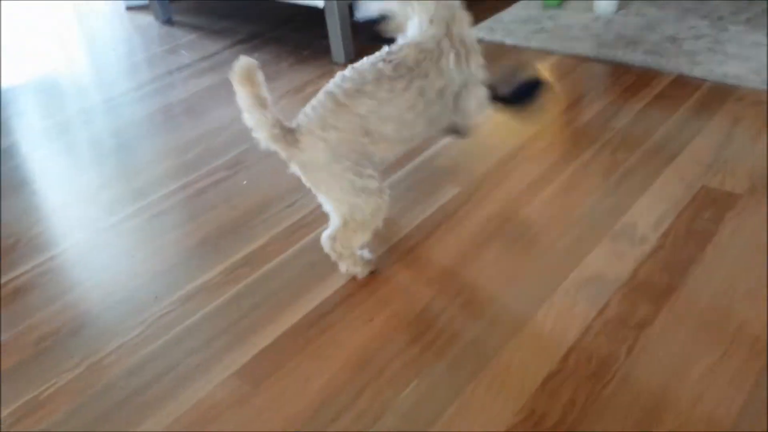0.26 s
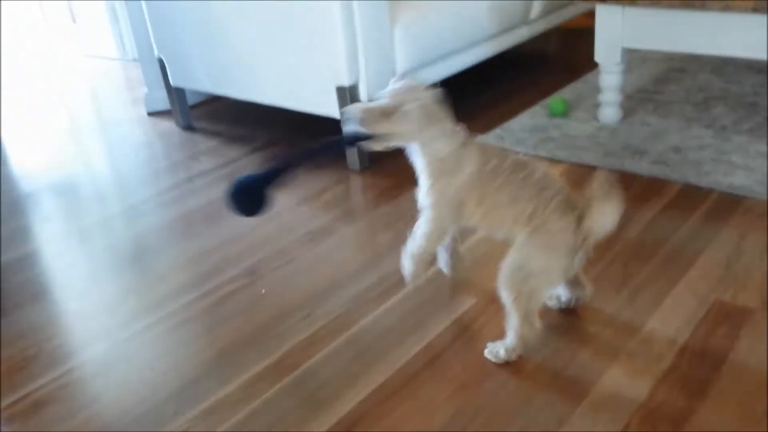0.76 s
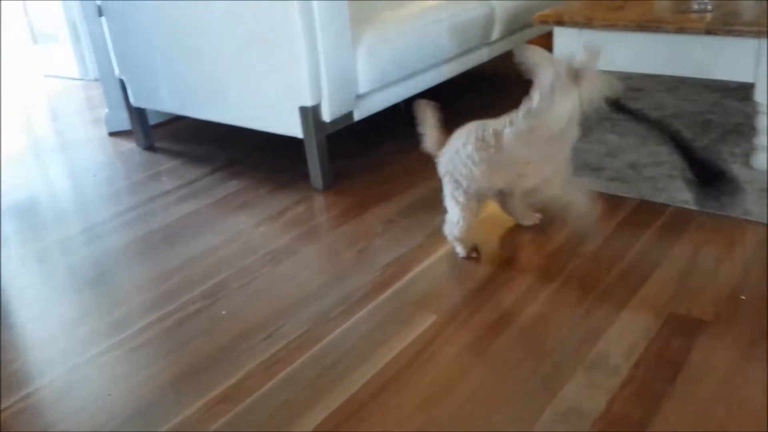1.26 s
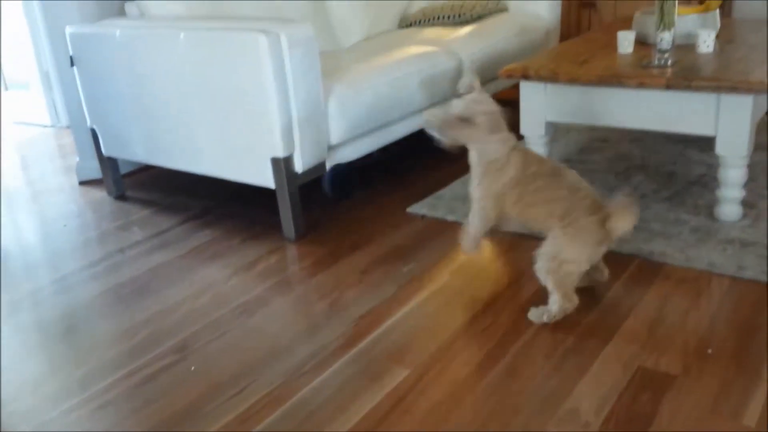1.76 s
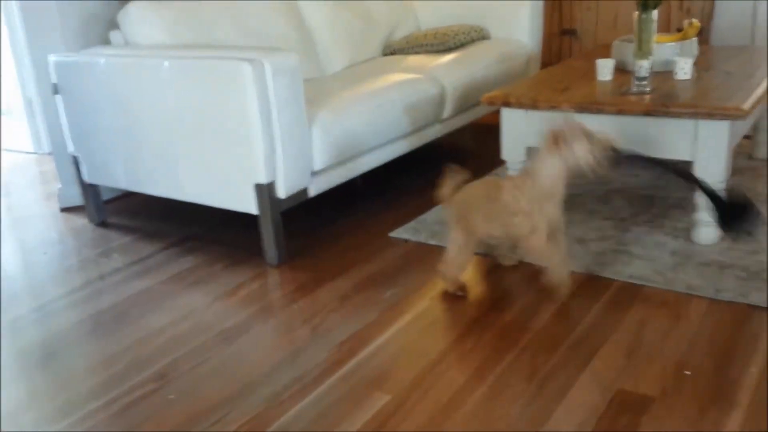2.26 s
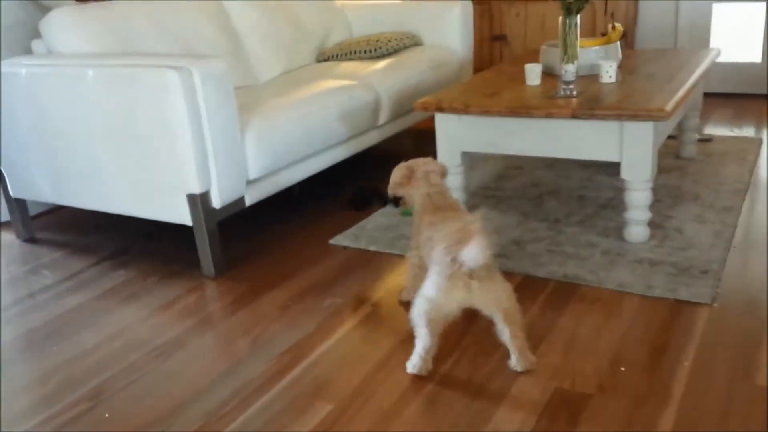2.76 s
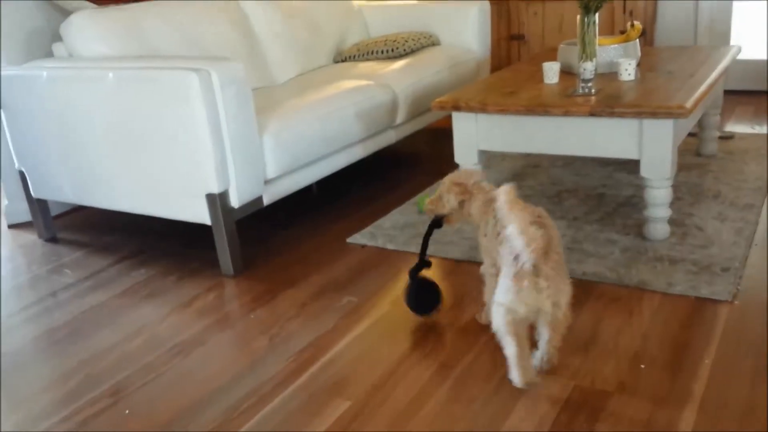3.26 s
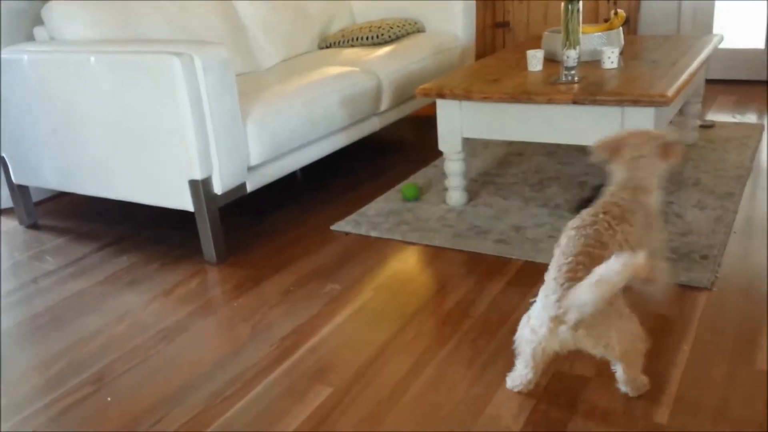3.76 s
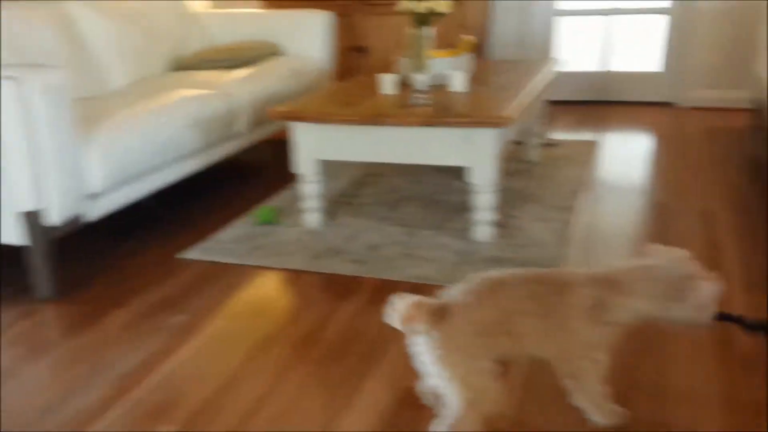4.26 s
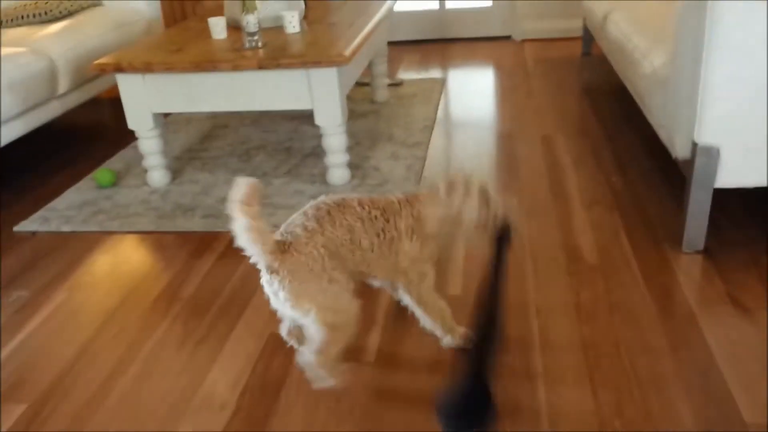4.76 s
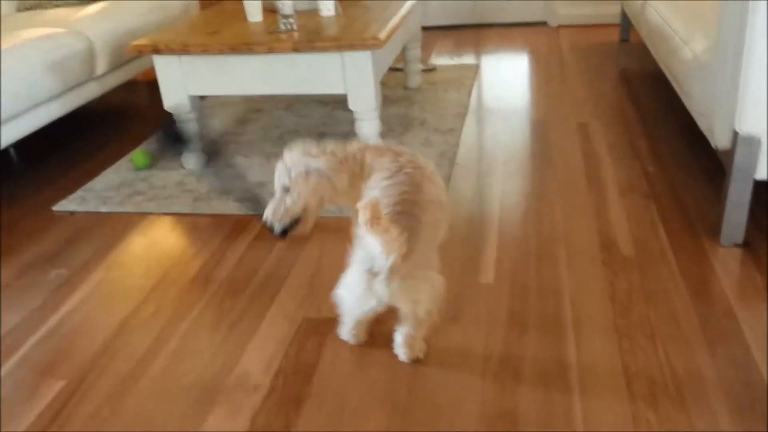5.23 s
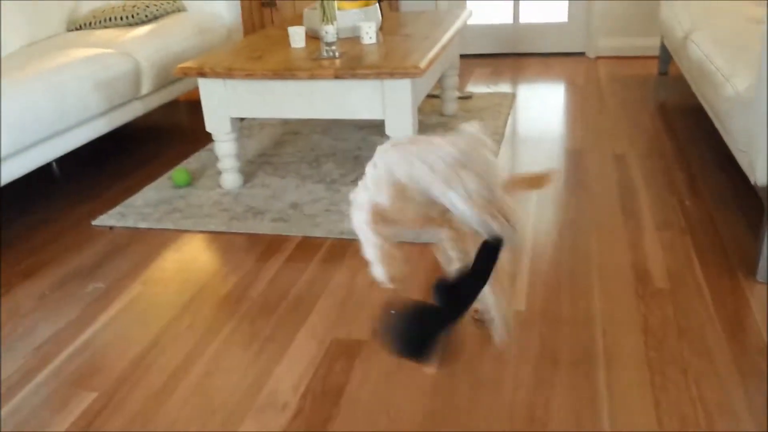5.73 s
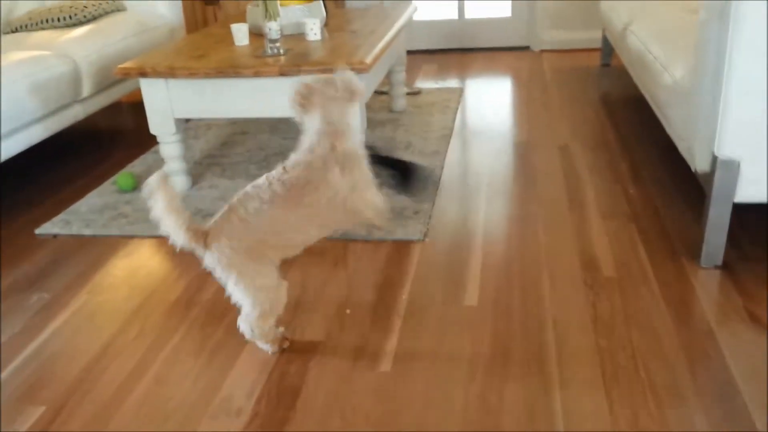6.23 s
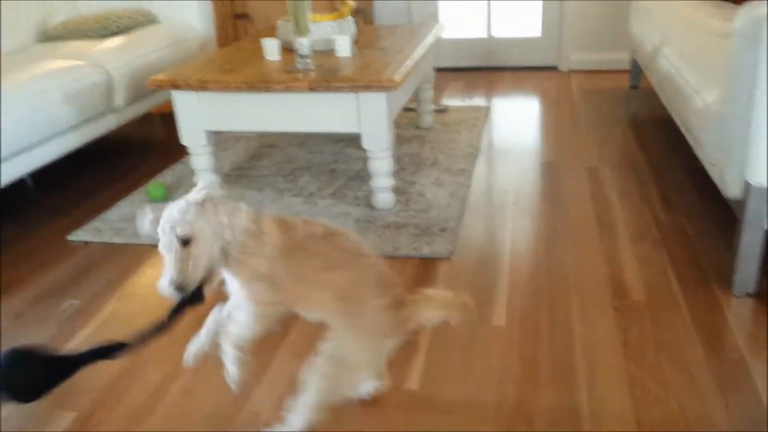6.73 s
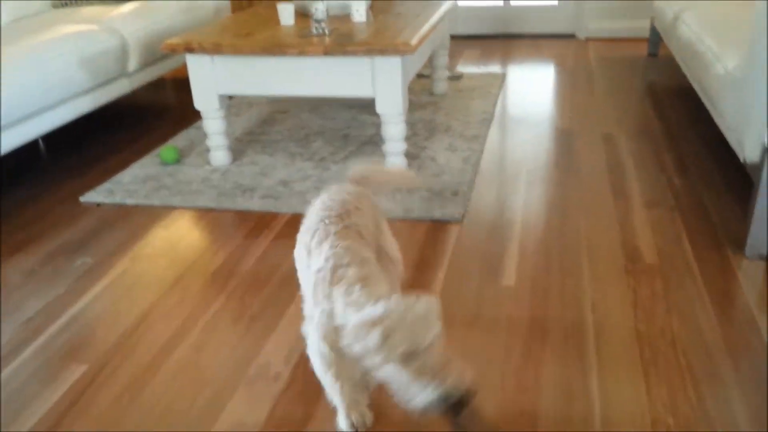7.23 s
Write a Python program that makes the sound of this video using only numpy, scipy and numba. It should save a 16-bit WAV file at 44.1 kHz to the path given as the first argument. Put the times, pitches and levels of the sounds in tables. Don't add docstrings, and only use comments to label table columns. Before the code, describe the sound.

A small dog growls in rough playful bursts, snorting and panting, as a cloth-wrapped ball knocks on wooden boards, claws click and a collar tag clinks.

```python
import sys
import numpy as np
from scipy import signal
from scipy.fft import rfft, irfft, next_fast_len
from scipy.io import wavfile
from scipy.ndimage import uniform_filter1d
from numba import njit

SR = 44100
rng = np.random.default_rng(int(sys.argv[2]) if len(sys.argv) > 2 else 0)


def wrap_up_sound(samples):
    columns = np.atleast_2d(samples).T
    tamed = np.clip(columns, -1, 1)
    steps = np.round(tamed * 32767).astype(np.int16)
    wavfile.write(sys.argv[1], SR, steps)


def elevation(decibels):
    levels = np.asarray(decibels, float)
    return 10 ** (levels / 20)


N = 330617
TIME = np.arange(N) / SR

# start in seconds, hold in seconds, chest level in dB,
# fold slaps per second in Hz, mouth opening in dB.
GROWLS = [(.478, 0.045, -36.5, 112.1, -9), (1.127, 0.26, -20, 142.2, -8.5), (1.692, .15, -24.5, 137.6, -5),
          (1.85, 0.09, -22.5, 139.7, -8.5), (2.35, 0.2, -32, 150.3, -6), (4.07, 0.0029, -37.5, 162, -1.5),
          (4.82, 0.04, -47, 133.1, -5), (5.125, 0.036, -52, 133.2, -8), (5.338, 0.04, -42, 109.6, -8),
          (5.757, 0.021, -32, 130, -9.5), (5.972, 0.032, -22.5, 130.4, -7), (6.0, .19, -18, 132.1, -11.5),
          (6.22, 0.11, -25.5, 125, -6), (6.605, .04, -27.5, 150.2, -12), (6.64, 0.09, -21.5, 158, -5.5),
          (6.73, 0.14, -17.5, 167.5, -10), (7.27, 0.035, -48, 119.7, 7.5)]
# frequency in Hz, width in Hz, level in dB.
MOUTH_RESONANCES = [(736, 77, -5), (1037, 175, -7), (1550, 320, -14.5), (2510, 590, -24.5),
                    (3670, 170, -19.5)]
# start in seconds, hold in seconds, level in dB,
# lip resonance in Hz.
SNARLS = [
    (1.16, 0.29, -40, 2480),
    (1.75, 0.18, -40.5, 2470),
    (2.37, 0.054, -59, 2360),
    (6.03, 0.24, -39.5, 2540),
    (6.27, 0.055, -46.5, 2360),
    (6.655, 0.044, -43, 2350),
    (6.76, 0.028, -39, 2250),
    (6.86, 0.072, -49.5, 2308),
]
# multiple of the lip resonance, width in Hz, level in dB.
LIP_PEAKS = [(1, 300, -3), (1.4, 450, -10.5), (1.6, 250, -22)]
# start in seconds, hold in seconds, level in dB, pitch in Hz.
WHINES = [
    (3.74, 0.18, -56.5, 985),
    (4.22, 0.044, -52, 965),
]
# start in seconds, hold in seconds, level in dB, nose resonance in Hz.
HUFFS = [(.06, 0.032, -45.5, 1780), (.26, 0.018, -49, 1740), (.48, 0.024, -41, 1635),
         (1.14, 0.12, -38.5, 1550), (1.28, 0.28, -45.5, 1595), (1.73, 0.13, -32, 1506),
         (1.84, 0.16, -36.5, 1620), (1.96, 0.11, -38.5, 1685), (2.24, 0.15, -48, 1620),
         (2.395, 0.054, -32.5, 1620), (2.46, 0.047, -38, 1397), (2.79, 0.048, -39, 1720),
         (3.62, 0.62, -56, 1730), (4.062, 0.048, -37, 1642), (4.21, 0.11, -49, 1660),
         (4.46, 0.045, -47, 1680), (4.66, 0.16, -64, 1680), (4.82, 0.022, -38, 1620),
         (5.15, 0.0098, -48, 1700), (5.34, 0.15, -44.5, 1569), (5.49, 0.19, -57.5, 1516),
         (5.77, 0.029, -39, 1703), (6.015, 0.059, -30.5, 1549), (6.17, 0.18, -40, 1544),
         (6.69, 0.33, -43.5, 1550)]
# multiple of the nose resonance, width in Hz, level in dB.
NOSE_PEAKS = [(1.003, 154, 6.5), (2.07, 356, -16.5)]
# start in seconds, hold in seconds, hiss level in dB,
# rasp over hiss in dB.
PUFFS = [(-.05, 0.17, -50, 8), (.18, 0.084, -56.5, 9.5), (.48, 0.076, -49.5, 1.5), (.69, 0.17, -53, 10),
         (1.13, 0.13, -39.5, -1), (1.22, 0.24, -47, 6), (1.55, 0.18, -50.5, 2.5), (1.73, 0.13, -44.5, -2),
         (1.87, 0.093, -40, 8), (2.24, 0.1, -59, 2), (2.355, 0.028, -46, 11.5), (2.39, 0.11, -41, 7.5),
         (2.72, 0.1, -50, 8.5), (3.47, 0.71, -60.5, 12), (4.0, 0.068, -49, 3), (4.28, 0.1, -48, -1.5),
         (4.45, 0.033, -44.5, 7.5), (4.6, 0.11, -55.5, -6), (4.81, 0.049, -46.5, 4), (5.14, 0.015, -65, -9),
         (5.35, 0.15, -52.5, 6), (5.5, 0.1, -63, 14), (5.78, 0.026, -47.5, -8), (6.0, 0.081, -39.5, -18),
         (6.14, 0.29, -46.5, 7), (6.55, 0.28, -45.5, 2), (6.74, 0.12, -43.5, -7), (7.2, 0.082, -48, 10.5)]
# frequency in Hz, level in dB per Hz.
RASP_COLOUR = [(500, -4), (900, -0.5), (2200, 0.5), (3400, 0), (4100, -3.5), (4800, -1.5), (6000, -36)]
# frequency in Hz, level in dB per Hz.
HISS_COLOUR = [(2240, -47), (3800, -18), (5300, 1), (6700, 4), (9150, 3), (11500, -8), (13500, -39),
               (15000, -51)]
# start in seconds, hold in seconds, level in dB,
# jet resonance in Hz.
SNORTS = [(.5, 0.045, -48, 7600), (1.14, 0.071, -43.5, 7100), (1.9, 0.062, -46, 6800),
          (2.39, 0.12, -41.5, 6630), (5.14, 0.044, -55.5, 6560), (5.765, 0.043, -42.5, 6900),
          (6.0, 0.024, -38.5, 7360), (6.17, 0.22, -52, 7440), (6.56, 0.067, -47.5, 8800),
          (6.77, 0.032, -43, 8800), (6.89, .05, -45, 7700), (7.25, 0.056, -52, 8140)]
# multiple of the jet resonance, width in Hz, level in dB.
JET_PEAKS = [(1, 650, 4), (.6, 427, -7), (1.3, 570, -22)]
# time in seconds, peak in dB, boom in dB, crack in dB.
KNOCKS = [(0.694, -26.5, -13, -16.5), (1.722, -23.5, -6.5, -26), (2.235, -25.5, -10.5, -21),
          (2.735, -31, -8.5, -24), (3.136, -31, -13.5, -26.5), (4.287, -35, -26, -31),
          (5.495, -27, -12.5, -17.5), (5.966, -33.5, -4.5, -26), (6.756, -17, -19.5, -29.5),
          (7.201, -23, -14, -28.5), (7.489, -40.5, -9, -39)]
# frequency in Hz, level in dB, time to fall 60 dB in seconds.
BOARD_MODES = [(820, -7, 0.017), (907, 7, 0.011), (1107, 2, 0.0093), (1620, -5, 0.012)]
# frequency in Hz, level in dB, time to fall 60 dB in seconds.
JOIST_MODES = [(101.3, 5.5, 0.05), (155, -8.5, 0.14), (212, 13.5, 0.013)]
# delay in seconds, level in dB.
WALLS = [(.0088, -5), (0.014, -9), (0.0219, -8), (.0285, -10)]
# time in seconds, peak in dB.
CLAWS = [(0.5342, -35), (1.1073, -24.5), (1.1145, -45), (1.6138, -28.5), (2.158, -23), (2.1626, -52),
         (2.1704, -43), (2.1813, -53), (2.6567, -23.5), (2.822, -30), (2.9517, -43), (3.0759, -63),
         (3.11, -50), (3.1794, -31.5), (4.036, -39.5), (4.233, -40.5), (4.6517, -40.5), (4.8248, -42),
         (5.1394, -61), (5.1597, -62), (5.3772, -38.5), (5.9872, -23), (5.9976, -46), (6.5577, -25),
         (7.03, -30), (7.0418, -59), (7.3281, -35), (7.4763, -39)]
# time in seconds, peak in dB, fur damping of the high modes in dB.
CLINKS = [
    (3.3986, -21.5, 4),
    (3.4034, -49, 2),
    (3.62, -44, 8),
    (3.831, -40, 20),
    (3.8584, -41, 12),
    (4.1, -54, 8),
    (4.2327, -33.5, 12),
    (4.4, -32, 7),
    (4.681, -41.5, 6),
    (7.242, -48, 8),
]
# frequency in Hz, level in dB, time to fall 60 dB in seconds.
TAG_MODES = [(710, -16, 0.21), (1702, -2.5, 0.063), (2770, -12.5, 0.45), (3410, -3, 0.16), (3570, -14, 0.2),
             (3890, -10.5, 0.27), (4620, 8, 0.084), (4490, 0.5, 0.1), (4900, -9, 0.1), (4970, -10, 0.16),
             (4960, 13, 0.037), (6230, 1.5, 0.2), (6270, 4, 0.054), (2742, -1.5, 0.22)]
# time in seconds, level in dB.
STIR = [(0, 6.5), (.42, -2.5), (1.05, -2.5), (2, 6.5), (3.3, -1), (4.2, 5.5), (4.8, 0), (5.1, -6.5),
        (5.31, -13), (5.5, -0.5), (7.16, -2), (7.5, -3.5)]
# frequency in Hz, level in dB per Hz.
AIR_COLOUR = [(35, -52), (60, -9), (149, -4), (906, -11.5), (1110, -12.5), (2970, -12), (7740, -10.5),
              (14000, -28.5)]
# time in seconds, peak in dB, sharpness in Hz.
POPS = [(0.269, -39, 820), (0.5754, -28, 570.0), (3.736, -35, 580), (4.06, -31, 650.0), (4.267, -25, 694),
        (4.3327, -33, 570.0), (4.3508, -26.5, 626), (4.3942, -31, 460.0), (4.4218, -8, 800),
        (4.435, -31, 566), (4.4381, -11.5, 870), (4.441, -25, 975), (4.444, -9, 1380), (4.463, -1.5, 2040),
        (4.4712, -5.5, 2440), (4.485, -14, 1940.0), (4.498, -19, 2000), (4.5121, -14, 2580),
        (4.513, -24, 1960), (4.5145, -13.5, 1620.0), (6.1208, -14, 1980), (6.1468, -4.5, 2030)]
# time in seconds, peak in dB, frequency in Hz.
BUMPS = [(0.269, -52, 157), (1.561, -45, 192.7), (2.605, -48, 151.5), (2.711, -18, 159.8),
         (2.752, -28, 130), (2.909, -45, 148), (2.937, -33.5, 139), (3.014, -36, 91), (3.037, -37, 135),
         (3.081, -39, 92.5), (3.107, -32, 113), (3.131, -39, 127), (3.36, -47, 101), (3.385, -39.5, 89),
         (3.414, -44, 135), (3.653, -37.5, 111), (3.768, -42, 128), (3.827, -42, 126), (3.855, -33, 97),
         (3.882, -34, 110), (3.912, -38, 114), (3.985, -45, 136.7), (4.01, -38, 125), (4.062, -49, 179),
         (4.173, -38, 126.3), (4.27, -46, 155), (4.348, -40, 193), (4.397, -39, 166)]
# time in seconds, level in dB.
RUB = [(0.0, -54), (0.27, -65.5), (2.46, -51), (3.72, -61), (4.36, -56), (4.55, -71), (5.28, -68),
       (5.66, -63), (6.89, -68), (7.5, -67)]
# frequency in Hz, time to fall 60 dB in seconds.
ROOM_T60 = [(100, 0.56), (400, 0.48), (1500, 0.63), (5000, 0.44), (12000, 0.39)]
# frequency in Hz, likeness where 1 is identical.
LIKENESS = [(60, 2.3), (180, 1), (540, 1.2), (1640, 0.5), (4930, -10), (14800, -7)]


def growl(jitter, shimmer_db, breathy):
    effort, age, pitch_hz, mouth_db = pushes(GROWLS, attack_s=.025, sag_db_s=25.5, release_db_s=400)
    mouth_db = mouth_db + 21.5 * age
    strain_db = np.maximum(20 * np.log10(effort), -50) + 28
    source = vocal_folds(pitch_hz, jitter, shimmer_db, breathy)
    chest = chest_ring(source, pitch_hz, strain_db)
    mouth = mouth_ring(source, mouth_db)
    voice = effort * elevation(-6.0) * (rms_one(chest) + elevation(mouth_db + 2.0) * rms_one(mouth))
    return voice + curled_lips(source)


def vocal_folds(pitch_hz, jitter, shimmer_db, breathy):
    cycles = np.cumsum(pitch_hz * np.exp(jitter * drift(45))) / SR
    slaps = (np.diff(np.floor(cycles), prepend=0) > 0) * elevation(shimmer_db * rng.uniform(-4.0, 1, N))
    gust = rng.standard_normal(N) * np.exp(-2.5 * (cycles % 1))
    surges = elevation(1.5 * drift(28))
    return (rms_one(slaps) + breathy * rms_one(gust)) * surges


def chest_ring(source, pitch_hz, strain_db):
    chest_hz = 227 + 7 * strain_db + 22 * drift(7.3)
    hum_db = 17 - np.maximum(strain_db, 0)
    chest = gliding(source, chest_hz, 100.0, SR)
    chest = chest + elevation(22) * butter(source, [140, 400], "band")
    chest = chest + elevation(hum_db) * gliding(source, pitch_hz, 250.0, SR)
    chest = butter(chest, 128.0, "high", order=8)
    return butter(chest, 364, "low", order=5)


def mouth_ring(source, mouth_db):
    jaw = np.exp(0.0057 * (mouth_db - 4.0))
    mouth = 0
    for k, (hz, width_hz, db) in enumerate(MOUTH_RESONANCES):
        moving_hz = hz * jaw * np.exp(0.032 * drift(12.6))
        mouth = mouth + (-1) ** k * elevation(db) * gliding(source, moving_hz, float(width_hz), SR)
    return butter(mouth, 570, "high", order=5)


def curled_lips(source):
    curl, _, lip_hz = pushes(SNARLS, attack_s=0.015, sag_db_s=42.0, release_db_s=180.0)
    return curl * butter(resonate(source, lip_hz, LIP_PEAKS, waver=0.12), [1800, 3900], "band")


def whine():
    level, _, hz = pushes(WHINES, attack_s=0.0063, sag_db_s=5.0, release_db_s=238)
    turns = np.cumsum(hz * np.exp(0.0148 * drift(20.0))) / SR
    return level * elevation(5.1 * drift(14)) * np.sin(2 * np.pi * turns)


def nose_breath(flutter_db):
    huff, _, nose_hz = pushes(HUFFS, attack_s=0.0063, sag_db_s=18.5, release_db_s=238)
    nose_hz = nose_hz * np.exp(.012 * drift(14))
    air = rng.standard_normal(N)
    whistle = 0
    for turns, width_hz, db in NOSE_PEAKS:
        once = gliding(air, turns * nose_hz, float(width_hz), SR)
        whistle = whistle + elevation(db) * gliding(once, turns * nose_hz, float(width_hz), SR)
    return huff * elevation(-6 + flutter_db * np.tanh(drift(27.0))) * rms_one(whistle)


def mouth_breath(flutter_db):
    puff, _, rasp_db = pushes(PUFFS, attack_s=0.011, sag_db_s=9.5, release_db_s=153)
    rasp = elevation(rasp_db - 9.5) * coloured(RASP_COLOUR)
    hiss = elevation(-1.5) * coloured(HISS_COLOUR)
    return elevation(flutter_db * drift(35)) * puff * (rasp + hiss)


def snorts():
    level, _, jet_hz = pushes(SNORTS, attack_s=0.0067, sag_db_s=22.0, release_db_s=160.0)
    jet = resonate(rng.standard_normal(N), jet_hz, JET_PEAKS, waver=.025)
    return level * elevation(0.96 * drift(36)) * jet


def ball():
    out, t = np.zeros(N), TIME[:SR // 2]
    for s, peak_db, boom_db, crack_db in KNOCKS:
        snap = elevation(-60 * t / 0.00029)
        crackle = 0.087 * rng.choice([-1, 1], len(t)) * elevation(-60 * t / 0.015)
        crack = butter(snap + crackle, [1300, 3800], "band", order=1)
        boards = struck(BOARD_MODES, spread_db=1.2)
        joists = struck(JOIST_MODES, spread_db=1.5)
        ring = 0.53 * boards + .5 * elevation(boom_db) * joists
        ring = ring * np.minimum(t / 0.0019, 1)
        add(out, s, elevation(peak_db + 12.0) * butter(ring + 16.3 * elevation(crack_db) * crack, 107, "high"))
    echoes = 0
    for lag_s, db in WALLS:
        echoes = echoes + elevation(db) * np.roll(out, round(lag_s * SR)) * (TIME > lag_s)
    return out + echoes


def claws():
    out, t = np.zeros(N), TIME[:900]
    for s, peak_db in CLAWS:
        tick = np.sin(2 * np.pi * rng.uniform(8500, 10500) * t) * elevation(-60 * t / .001)
        skid = rng.standard_normal(len(t)) * elevation(-60 * t / 0.037)
        edge = butter(tick + .2 * skid, [6500, 12500], "band", order=3)
        add(out, s + 0.0027, elevation(peak_db + 13.0) * edge)
    return out


def tag():
    out, t = np.zeros(N), TIME[:900]
    for s, peak_db, damping_db in CLINKS:
        add(out, s, elevation(peak_db - 15) * struck(TAG_MODES, spread_db=1.5, damping_db=damping_db))
        crack = butter(rng.standard_normal(900), [2500, 7000], "band") * elevation(-60 * t / 0.024)
        add(out, s, elevation(peak_db - 1.0 - damping_db / 2) * crack)
    return out


def finger():
    out, t = np.zeros(N), TIME[:2500]
    for s, peak_db, sharp_hz in POPS:
        spike = np.exp(-2 * np.pi * sharp_hz * np.abs(t - .001))
        add(out, s - .001, -elevation(peak_db + 1.5) * spike)
        swing = np.sin(2 * np.pi * 170 * t) * np.exp(-t / 0.005)
        add(out, s, elevation(peak_db - 5.0) * 800 / sharp_hz * swing)
    for s, peak_db, hz in BUMPS:
        press = np.sin(2 * np.pi * hz * t) * np.exp(-(t * hz - 1) ** 2 / 0.37)
        add(out, s - 1 / hz, elevation(peak_db + 3.5) * press)
    rumble = rms_one(butter(rng.standard_normal(N), [28, 130], "band"))
    rumble = rumble * elevation(11.8 * np.tanh(drift(9.2)))
    rub_db = np.interp(TIME, *np.transpose(RUB)) + 6.0
    return butter(out + elevation(rub_db) * rumble, 22, "high", order=1)


def stirred_air():
    stir_db = np.interp(TIME, *np.transpose(STIR))
    return elevation(-50 - 8.5 + stir_db) * coloured(AIR_COLOUR)


def room(x, early_db, late_db):
    lap_s = .9
    size, out = next_fast_len(N + SR), 0
    for spot in range(4):
        nearness = 2 / 3 * np.cos(np.pi * (TIME / lap_s - spot / 4)) ** 4
        out = out + rfft(x * np.sqrt(nearness), size) * rfft(room_response(early_db, late_db), size)
    return irfft(out, size)[:, :N]


def room_response(early_db, late_db):
    t = TIME[:SR]
    hits = (rng.random((2, SR)) < 280 / SR) * rng.standard_normal((2, SR))
    echoes = hits * elevation(-60 * t / 0.25) * (t > .003) + 1e-12 * rng.standard_normal(SR)
    early = butter(echoes, 790, "high", order=4) + butter(echoes[0], 740, "low", order=4)
    late, white = 0, rng.standard_normal((2, SR)) * np.minimum(t / 0.0024, 1)
    edges = 45 * 2 ** np.arange(9.)
    for low, high in zip(edges, np.minimum(edges * 2, .45 * SR)):
        mid, side = butter(white, [low, high], "band")
        hz = np.sqrt(low * high)
        alike = np.clip(at_hz(LIKENESS, hz), 0, 1)
        band = np.sqrt(1 + alike) * mid + np.sqrt(1 - alike) * side * [[1], [-1]]
        late = late + elevation(-60 * t / at_hz(ROOM_T60, hz)) * band
    both = 0
    for db, part in ((early_db, early), (late_db, late)):
        both = both + elevation(db) * part / np.sqrt(np.sum(part ** 2) / 2)
    both = rfft(both)
    power = np.abs(both) ** 2
    bumps = uniform_filter1d(power, size=22) / uniform_filter1d(power, size=1500)
    return irfft(both / np.sqrt(bumps + .05), SR) * (t > .003) * (t < .85)


def pushes(rows, attack_s, sag_db_s, release_db_s):
    t = TIME[::32]
    s, hold, level_db, *more = np.array(rows).T[:, :, None]
    age = t - s - attack_s
    rise = np.clip(age / attack_s + 1, 0, 1) ** 2
    fall_db = sag_db_s * np.maximum(age, 0) + release_db_s * np.maximum(age - hold, 0)
    power = (rise * elevation(level_db - fall_db)) ** 2 + 1e-30
    total = power.sum(axis=0)
    tracks = [np.sqrt(total)]
    for column in (np.clip(age, 0, hold), *more):
        tracks.append((power * column).sum(axis=0) / total)
    return [np.interp(TIME, t, track) for track in tracks]


def resonate(source, hz, shape, waver):
    out = 0
    for k, (turns, width_hz, db) in enumerate(shape):
        moving_hz = turns * hz * np.exp(waver * drift(21.0))
        out = out + (-1) ** k * elevation(db) * gliding(source, moving_hz, float(width_hz), SR)
    return rms_one(out)


@njit
def gliding(x, hz, width_hz, rate):
    r, out = np.exp(-np.pi * width_hz / rate), np.zeros(len(x))
    for i in range(2, len(x)):
        push = (1 - r * r) / 2 * (x[i] - x[i - 2])
        out[i] = push + 2 * r * np.cos(2 * np.pi * hz[i] / rate) * out[i - 1] - r * r * out[i - 2]
    return out


def struck(modes, spread_db, damping_db=0.):
    t = TIME[:SR // 2]
    hz, level_db, t60 = np.array(modes).T[:, :, None]
    chance_db = spread_db * rng.standard_normal(hz.shape)
    strength = elevation(level_db - damping_db * (hz > 3700) + chance_db)
    return (strength * elevation(-60 * t / t60) * np.sin(2 * np.pi * hz * t)).sum(axis=0)


def coloured(spectrum):
    size = next_fast_len(N)
    hz = np.arange(size // 2 + 1) * SR / size
    shaped = rfft(rng.standard_normal(size)) * elevation(at_hz(spectrum, hz))
    return rms_one(irfft(shaped, size)[:N])


def drift(rate):
    r = np.exp(-32 * np.pi * rate / SR)
    slow = signal.lfilter([1], [1, -2 * r, r * r], rng.standard_normal(N // 16 + 2002))[2000:]
    return np.interp(np.arange(N) / 16, np.arange(len(slow)), rms_one(slow))


def at_hz(points, hz):
    table = np.array(points)
    return np.interp(np.log(hz + 1), np.log(table[:, 0]), table[:, 1])


def rms_one(x):
    return x / np.sqrt(np.mean(x ** 2) + 1e-20)


def butter(x, hz, kind, order=2):
    return signal.sosfilt(signal.butter(order, hz, kind, fs=SR, output="sos"), x)


def add(out, s, sound):
    i = round(s * SR)
    out[i:i + len(sound)] += sound[:N - i]


def scene():
    voice = growl(jitter=.17, shimmer_db=3.0, breathy=.3)
    breath = nose_breath(flutter_db=4.0) + mouth_breath(flutter_db=4.0) + snorts()
    dog = voice + breath + stirred_air()
    hits, clinks = ball(), tag() + claws()
    direct = elevation(-1.5) * dog + hits + clinks
    echoes = room(dog + elevation(-0.5) * hits + elevation(4.0) * clinks, early_db=0.0, late_db=1.5)
    air = direct + echoes + whine()
    left = np.roll(air[0], 3)
    covered = butter(left, 430, "low", order=1)
    open_port = elevation(3.0) * butter(left, 4300, "low", order=3)
    slide = np.clip((TIME - 4.47) / 0.0064, 0, 1)
    return np.array([(1 - slide) * covered + slide * open_port + finger(), air[1]])


def top_cut(x):
    return signal.sosfilt(signal.butter(12, 15440, fs=SR, output="sos"), x)


def record(dry):
    dry = dry - 0.2 * signal.lfilter(*signal.iirpeak(4016, 9.0, fs=SR), dry)
    loudness_db = 10 * np.log10(uniform_filter1d(dry[1] ** 2, 6000) + 1e-8)
    hiss = elevation(-63.5 + 0.099 * (loudness_db + 54)) * rng.standard_normal(dry.shape)
    hiss = hiss * elevation(np.array([[0], [-9.0]]))
    top = signal.cheby2(10, 30, 14900, fs=SR, output="sos")
    return top_cut(signal.sosfilt(top, dry + hiss))


dry = scene()
out = record(dry)
wrap_up_sound(out)
```